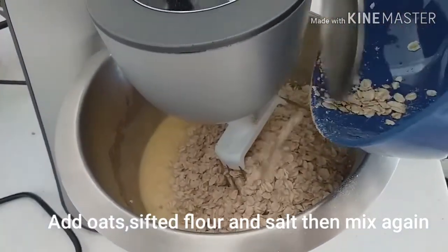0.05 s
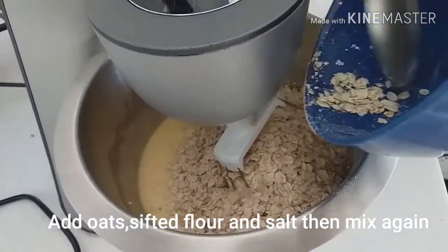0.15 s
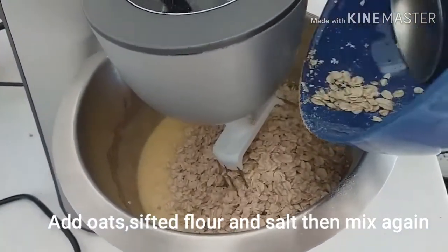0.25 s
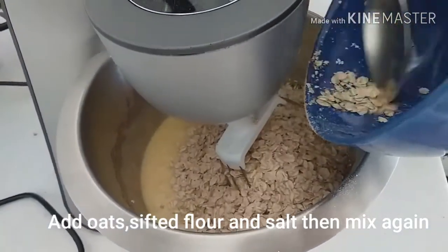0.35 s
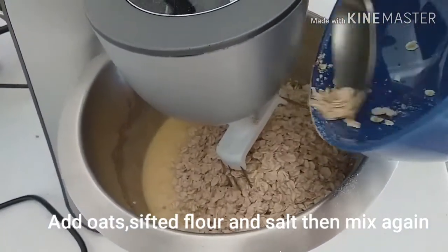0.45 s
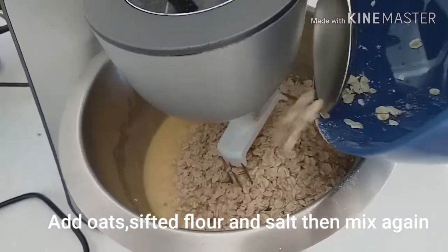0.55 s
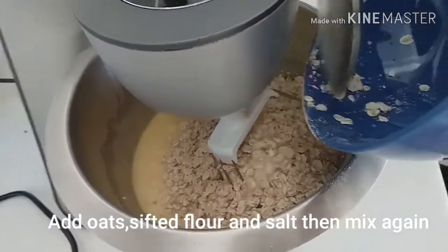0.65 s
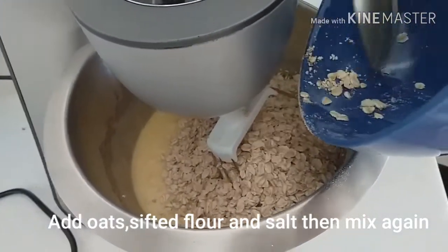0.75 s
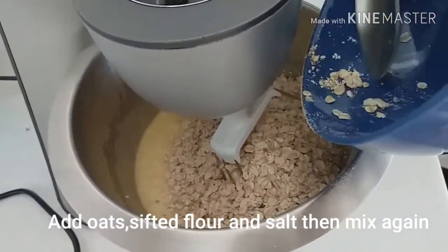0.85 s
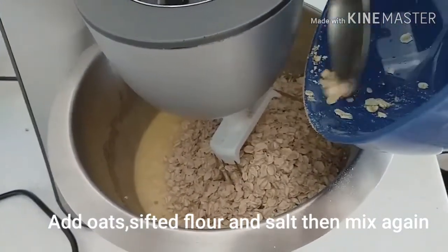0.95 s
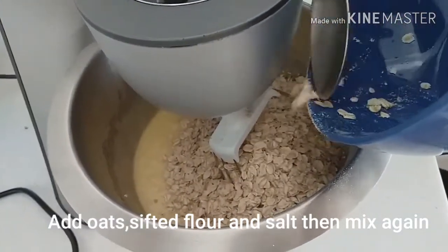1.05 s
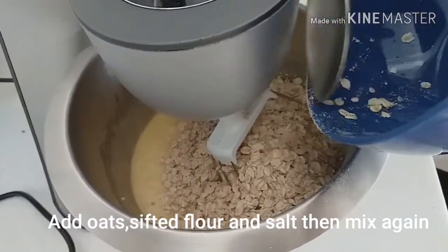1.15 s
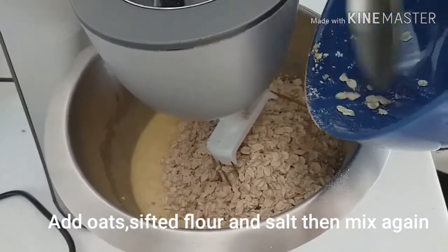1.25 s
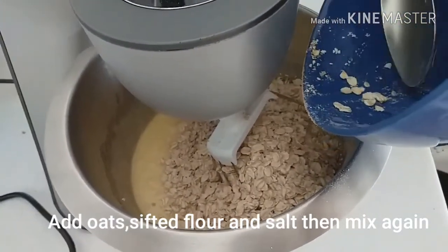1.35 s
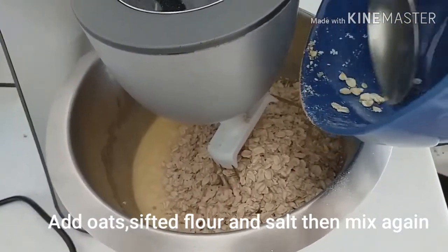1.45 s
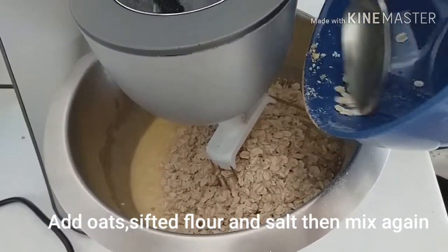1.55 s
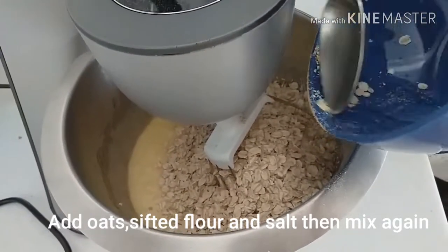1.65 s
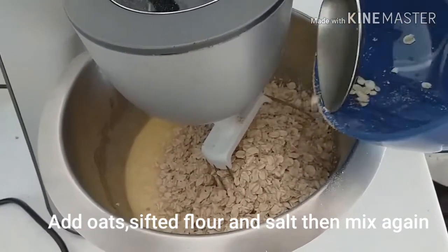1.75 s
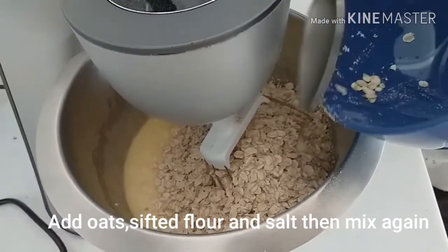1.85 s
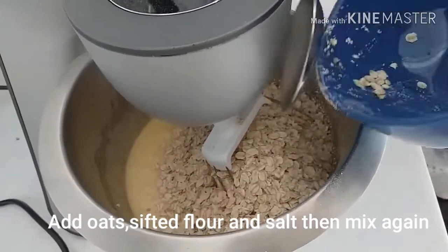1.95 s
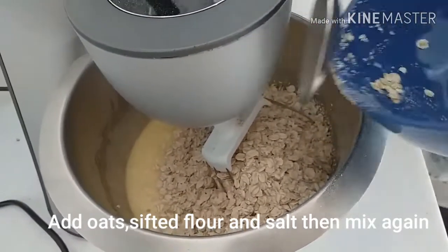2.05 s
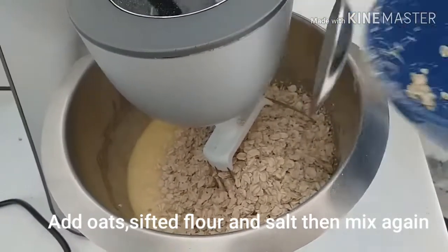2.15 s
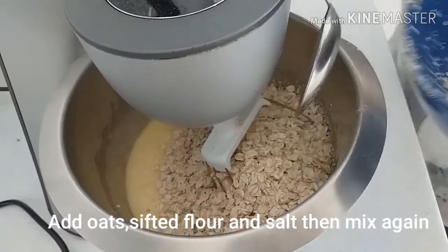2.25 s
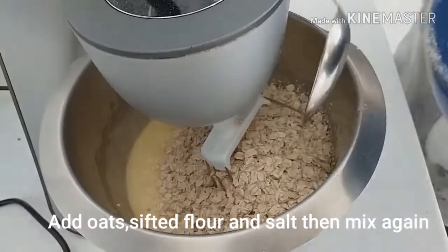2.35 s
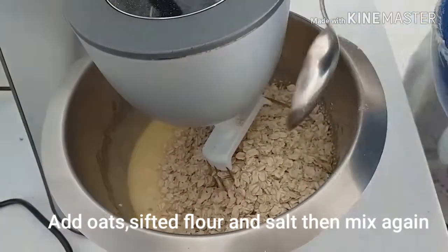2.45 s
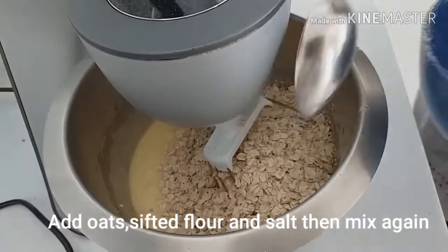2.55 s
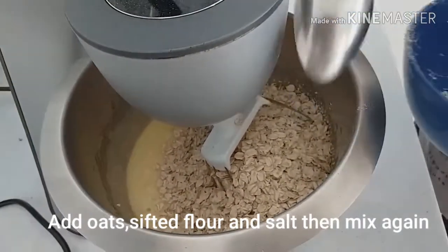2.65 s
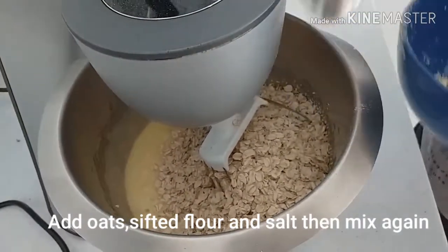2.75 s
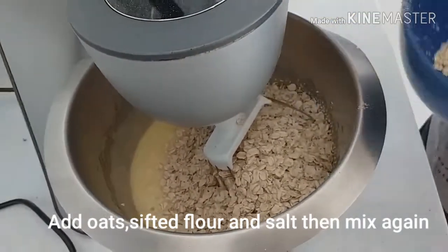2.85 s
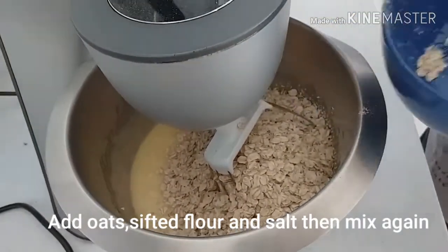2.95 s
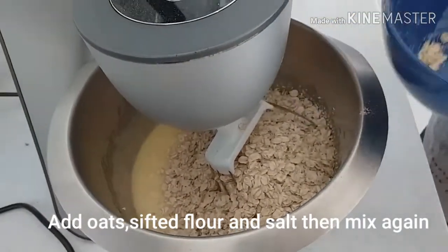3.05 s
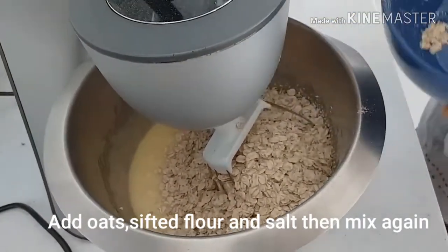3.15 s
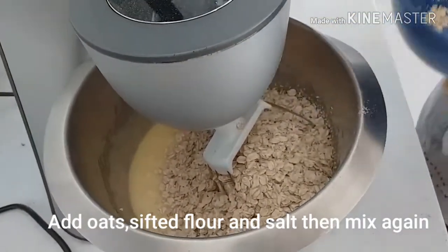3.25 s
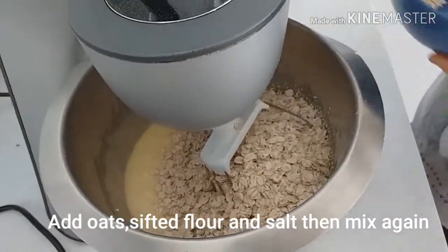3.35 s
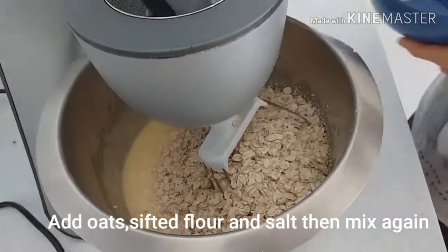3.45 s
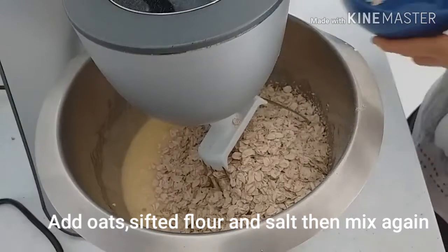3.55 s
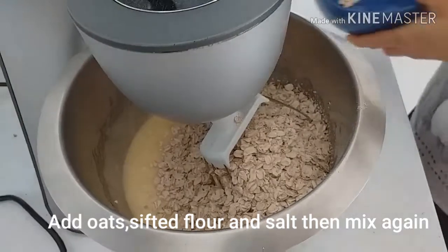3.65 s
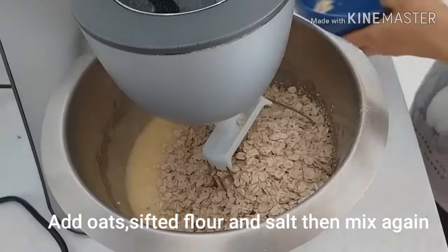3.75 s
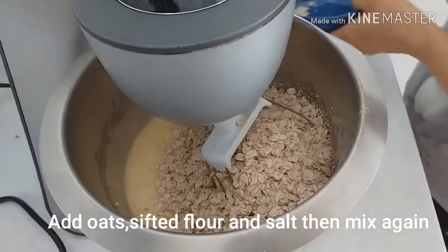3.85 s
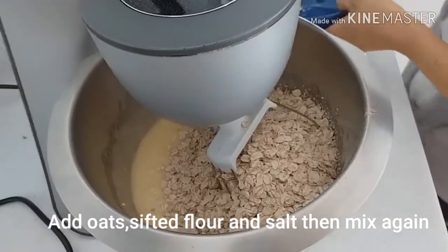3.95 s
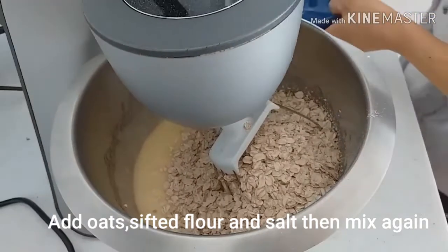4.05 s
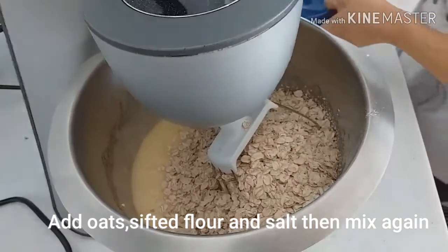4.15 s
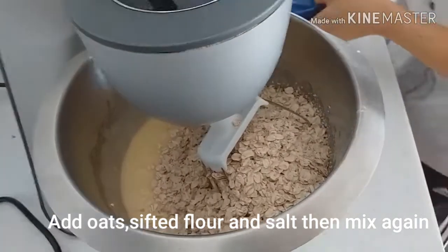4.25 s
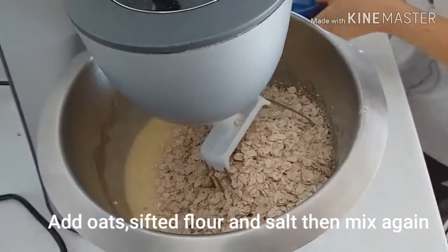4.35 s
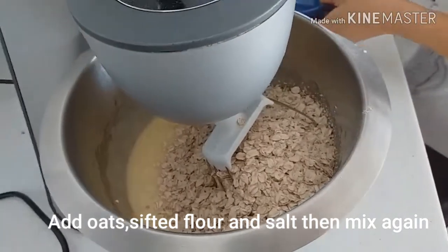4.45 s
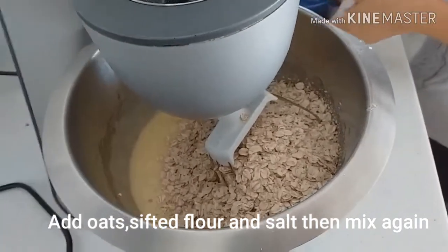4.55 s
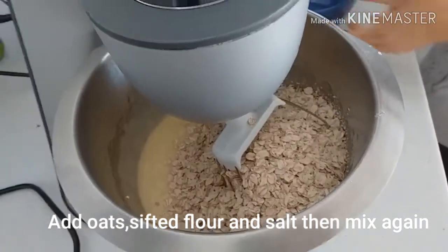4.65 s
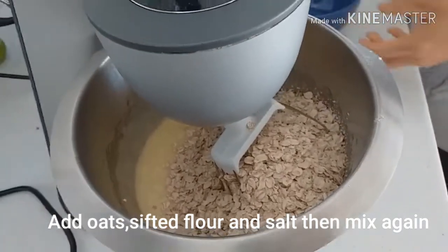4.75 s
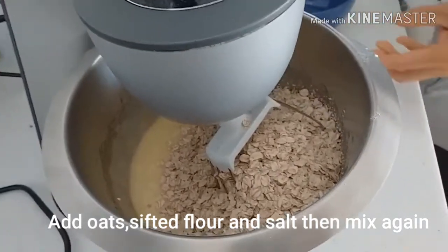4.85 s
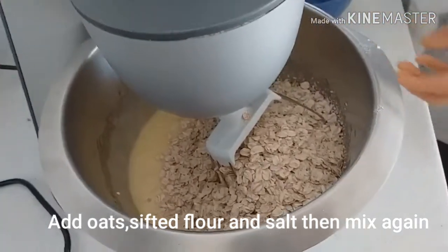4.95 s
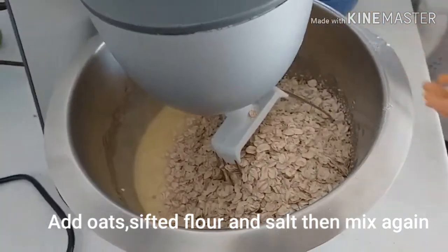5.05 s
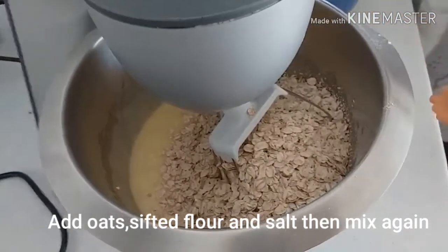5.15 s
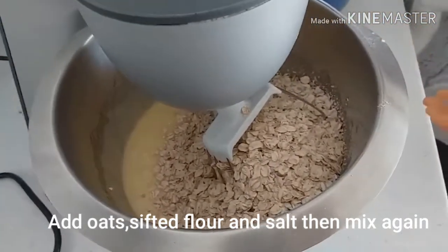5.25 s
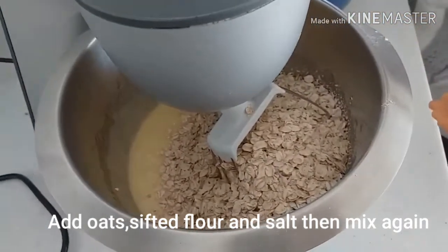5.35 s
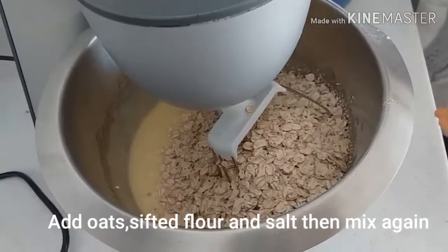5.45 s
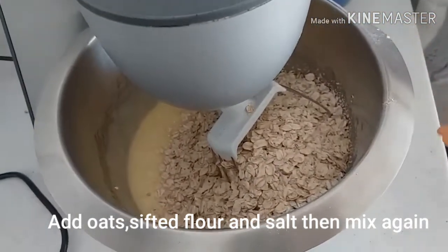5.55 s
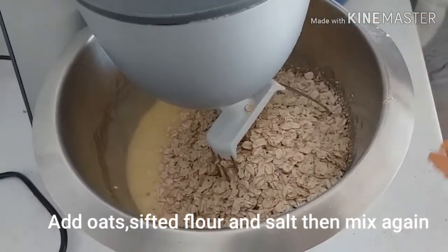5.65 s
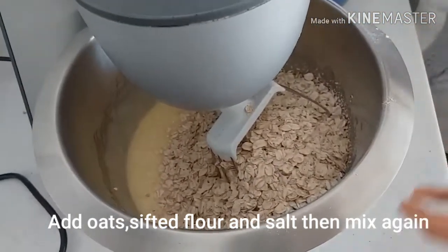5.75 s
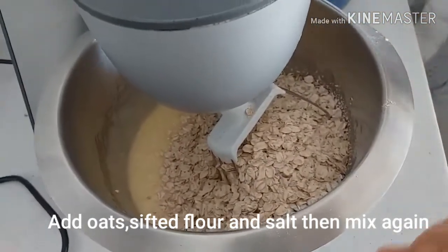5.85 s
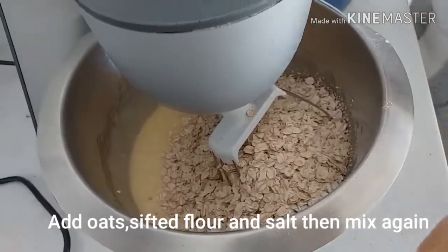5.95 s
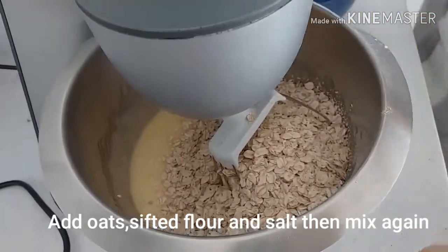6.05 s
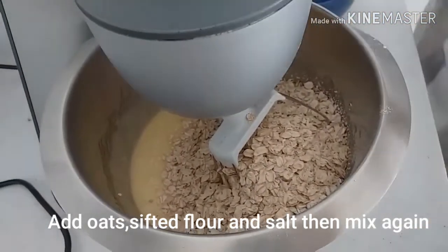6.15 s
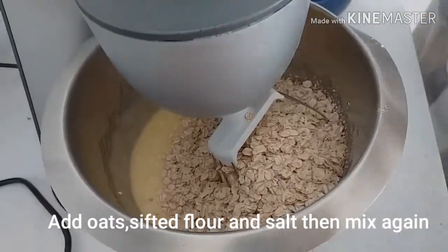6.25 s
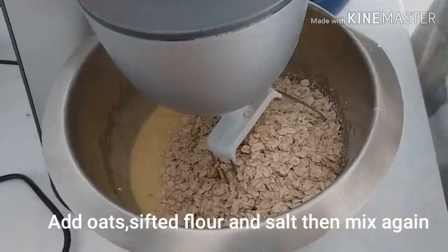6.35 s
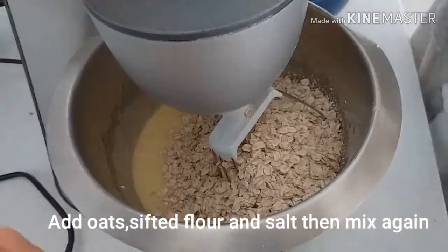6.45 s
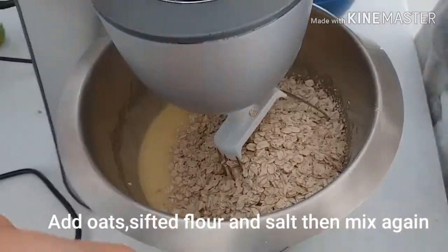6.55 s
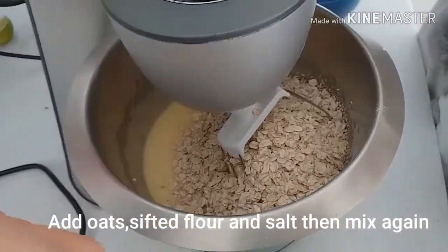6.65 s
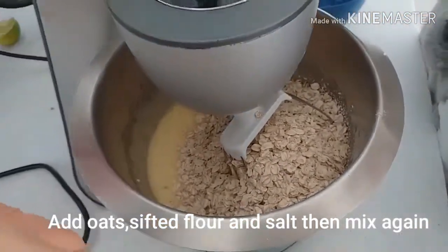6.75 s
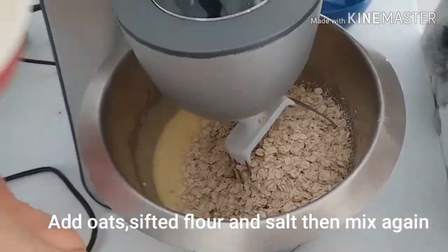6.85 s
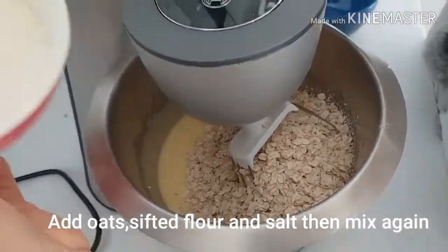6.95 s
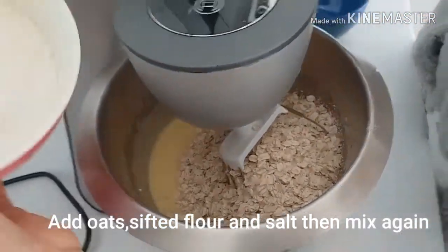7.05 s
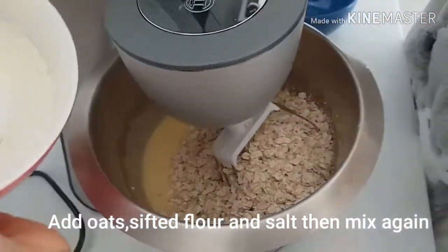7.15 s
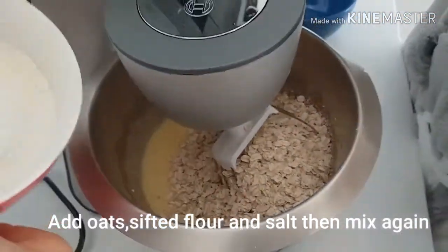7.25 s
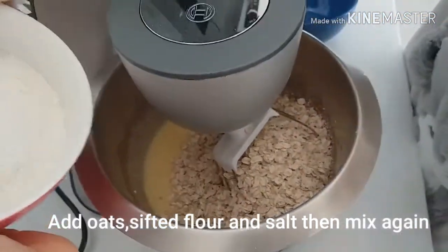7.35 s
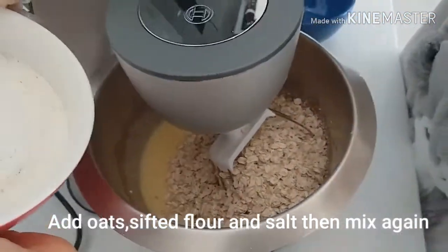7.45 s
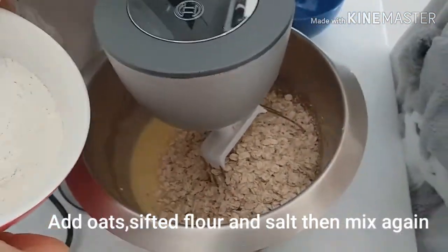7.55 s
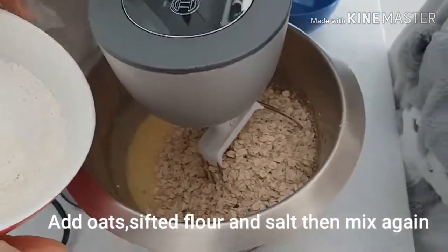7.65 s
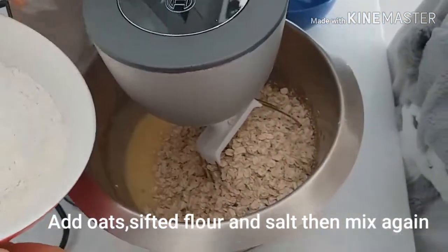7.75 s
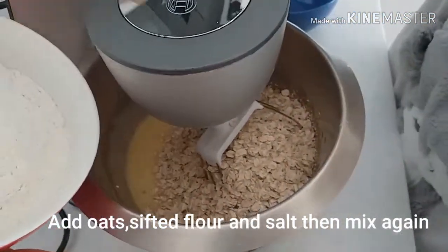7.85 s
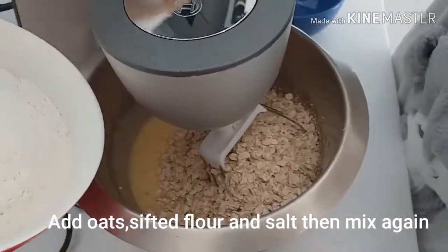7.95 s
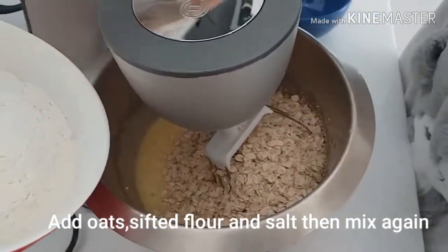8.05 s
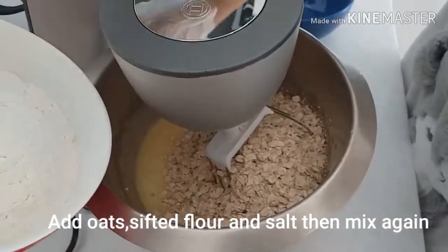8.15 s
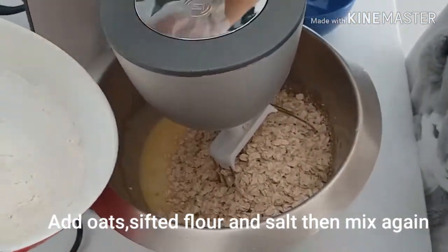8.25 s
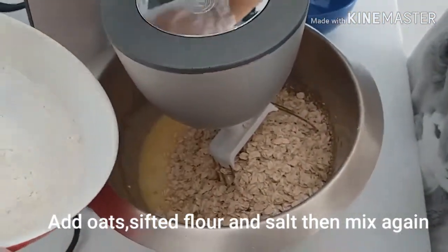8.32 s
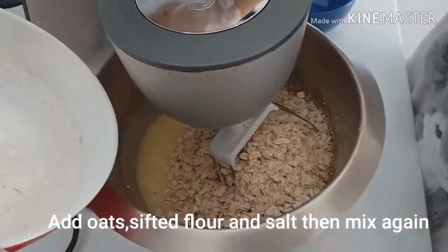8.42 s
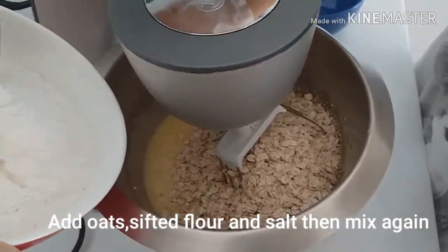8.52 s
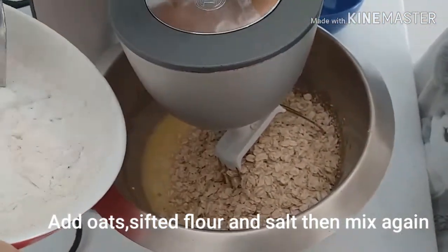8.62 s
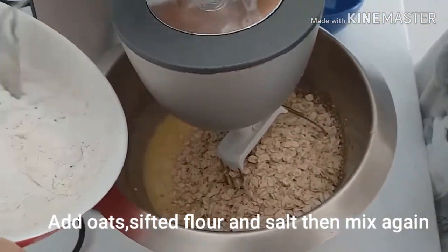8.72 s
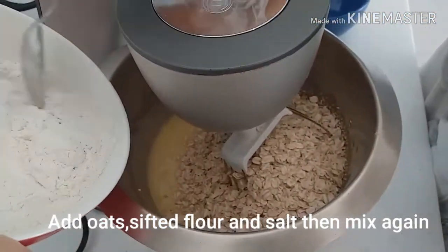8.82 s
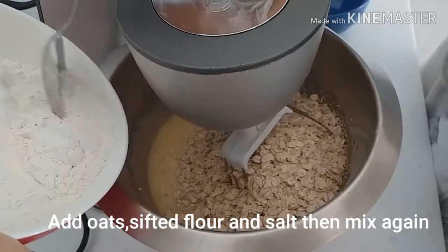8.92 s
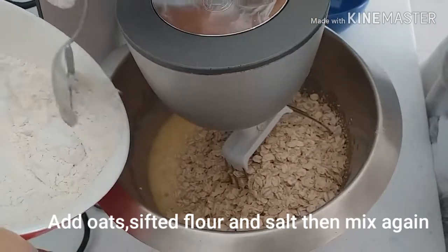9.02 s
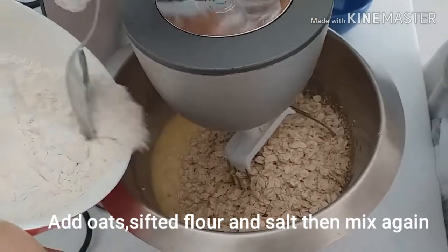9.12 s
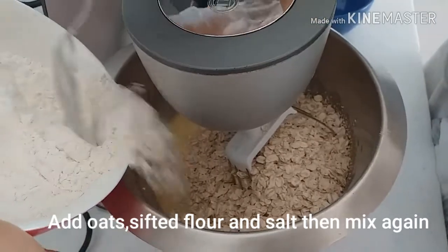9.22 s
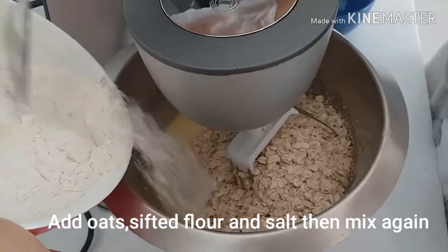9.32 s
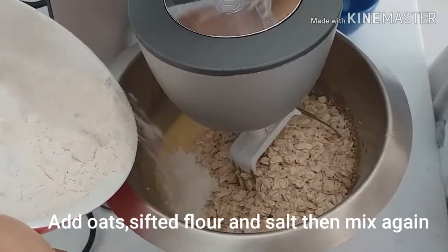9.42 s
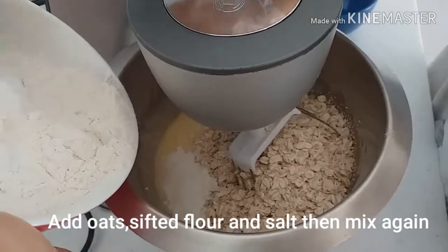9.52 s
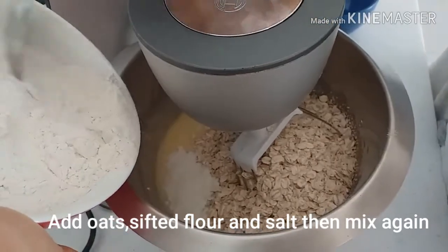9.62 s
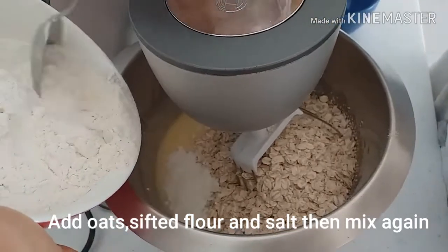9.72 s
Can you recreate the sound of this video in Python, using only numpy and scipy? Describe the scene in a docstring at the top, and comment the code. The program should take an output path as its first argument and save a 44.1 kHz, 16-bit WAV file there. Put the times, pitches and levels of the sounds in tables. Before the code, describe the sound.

A quiet small kitchen with hard walls, a faint low hum beneath, heard close up. From 0 to 2.1 s a steel spoon taps a plastic bowl irregularly, sharpest near 0.25 and 1.0 s, with short faint squeaky scrapes around 0.4, 1.0 and 1.5 s and soft patters of dry oats. Crisp ticks come at 2.2-2.45 s, then cloth rustles in swells until about 4.3 s, with a thin airy swish near 4 s. At 4.06 s the plastic bowl slaps down hard, the counter booms, and it rocks lightly at 4.25-4.3. Bright steel clinks with low bumps follow at 4.6 and 4.95 s. Rustling fades to near quiet around 5.5-6.8 s. A small clink at 7.6 and a dull bump at 7.77 s accompany stronger cloth rustle peaking at 8-8.2 s. Faint clink and bump at 8.9, a clearer, lower clink with bump at 9.5, then soft rustle.

```python
"""A low hum and soft rubbing, then a steel spoon taps and scrapes the last oats from a plastic bowl into a mixer.
The bowl lands on the counter, steel clinks, and an apron rustles as flour is fetched, bumped and spooned in.
Blows are decaying sine modes plus shaped noise bursts; drags are noise through resonances read at a varying speed;
rubbing is random slips under movement envelopes; a thin hiss is noise shifted to a moving pitch. The hum is a sine
over filtered noise. A small hard-walled kitchen answers the blows and the rustle."""
import sys
import numpy as np
from scipy import signal
from scipy.fft import rfft, irfft, next_fast_len
from scipy.io import wavfile
from scipy.ndimage import map_coordinates

SR = 44100
rng = np.random.default_rng(int(sys.argv[2]) if len(sys.argv) > 2 else 0)


def transcribe(signal):
    """Save signal, clipped to [-1, 1], as a 16-bit WAV file at the path in sys.argv[1]."""
    frames = np.atleast_2d(signal).T
    limited = np.clip(frames, -1, 1)
    pcm = np.round(limited * 32767).astype(np.int16)
    wavfile.write(sys.argv[1], SR, pcm)


N = 431298
CLOCK = np.arange(N) / SR  # whole scene, s
T = np.arange(SR // 2) / SR  # one blow, s


def amp(db):
    """Decibels to gain."""
    return 10 ** (np.asarray(db) / 20)


def unit(x):
    """Scale to rms 1."""
    return x / np.sqrt(np.mean(x ** 2) + 1e-20)


def along(points, hz):
    """Read (freq_hz, value) points on a log frequency axis."""
    point_hz, values = np.transpose(points)
    return np.interp(np.log(hz + 1), np.log(point_hz), values)


def filtered(x, response):
    """Multiply the spectrum of x by a response of frequency in Hz."""
    size = next_fast_len(len(x) + SR // 4)
    spectrum = rfft(x, size) * response(np.fft.rfftfreq(size, 1 / SR))
    return irfft(spectrum, size)[:len(x)]


def coloured(x, spectrum):
    """Filter x by (freq_hz, level_db) points, then scale to rms 1."""
    return unit(filtered(x, lambda hz: amp(along(spectrum, hz))))


def wobble(rate):
    """Smooth random curve over the scene, rate knots per second."""
    knots = rng.standard_normal(int(N * rate / SR) + 4)
    return map_coordinates(knots, [CLOCK * rate])


def fade(t60, t=T):
    """Exponential decay: -60 dB after t60 seconds."""
    return 1000 ** (-t / t60)


def burst(spectrum, t60):
    """Many crowded modes dying together, as decaying noise whose energy grows with t60."""
    decay = fade(t60)
    noise = coloured(rng.standard_normal(len(T)), spectrum)
    return unit(noise * decay) * np.sqrt(np.mean(decay ** 2))


def ring(modes, scatter_db):
    """Sum separate (freq_hz, level_db, t60_s) modes, with random sign and strength for each blow."""
    total = 0
    for hz, db, t60 in modes:
        strength = amp(db + scatter_db * rng.normal()) * rng.choice([-1, 1])
        total = total + strength * np.sin(2 * np.pi * hz * T) * fade(t60)
    return total


def add(track, s, sound):
    """Mix a sound into a track at time s."""
    part = track[round(s * SR):][:len(sound)]
    part += sound[:len(part)]


def in_kitchen(x, wet_db, near_db=-8, near_t60=0.038):
    """Direct sound, quick echoes off mixer and counter, and a room tail that decays by frequency."""
    # Room decay: freq_hz, t60_s
    kitchen_t60 = [(100, 0.41), (400, 0.84), (1500, 0.67), (4000, 0.54), (8000, .42), (15000, 0.15)]
    hz, t, z = signal.stft(rng.standard_normal(SR), SR, nperseg=256)
    decay = fade(along(kitchen_t60, hz)[:, None], t)
    tail = signal.istft(z * decay, SR, nperseg=256)[1]
    near = rng.standard_normal(len(T)) * fade(near_t60) * (T > .002)
    echo = amp(wet_db) * tail / np.linalg.norm(tail)
    add(echo, 0, amp(near_db) * near / np.linalg.norm(near))
    echo[0] = 1  # direct sound
    return signal.fftconvolve(x, echo)


def gesture(s, attack, hold, release):
    """Movement speed, 0 to 1: tenfold growth per attack time, hold from s, tenfold fall per release time."""
    before = np.maximum(s - CLOCK, 0) / attack
    after = np.maximum(CLOCK - s - hold, 0) / release
    return 10 ** -np.minimum(before + after, 10)


def background(air_db=-64, hum_db=-71, hum_hz=100):
    """Low room noise and an appliance's mains hum, both drifting in level."""
    # Quiet kitchen spectrum: freq_hz, level_db
    air_spectrum = [(15, -59), (25, -29.5), (102, -1), (124, -9.5), (146, -4.5), (240, -3.5), (277, -3),
                    (421, -14), (681, -18.5), (832, -27), (1100, -17.5), (1350, -31), (3000, -42),
                    (3900, -69.5), (6600, -120)]
    air = coloured(rng.standard_normal(N), air_spectrum)
    hum = np.sin(2 * np.pi * hum_hz * CLOCK)
    air_gain = amp(air_db + 2.4 * wobble(rate=5.2))
    hum_gain = amp(hum_db + 1.3 * wobble(rate=6.7))
    return air_gain * air + hum_gain * hum


def swish(width_hz=1200):
    """Thin sliding hiss: low-passed noise multiplied by a sine of moving pitch."""
    # Hiss path: time_s, level_db, centre_hz
    swish_path = [(3.66, -61, 12100), (3.7, -49, 12400), (3.94, -43.5, 13900), (4.1, -48.5, 14200),
                  (4.26, -49, 12190), (4.4, -59, 11220)]
    path_s, path_db, path_hz = np.transpose(swish_path)
    db = np.interp(CLOCK, path_s, path_db)
    hz = np.interp(CLOCK, path_s, path_hz)
    hiss = unit(filtered(rng.standard_normal(N), lambda f: np.exp(-(f / width_hz) ** 2)))
    moving = (CLOCK > path_s[0]) & (CLOCK < path_s[-1])
    return moving * amp(db) * hiss * np.sin(2 * np.pi * np.cumsum(hz) / SR)


def friction_levels():
    """Gains of rubbing, fizz and sliding: each arm movement or landing spoonful of oats drives all three."""
    # Arm movements: full_speed_s, attack_s, hold_s, release_s, level_db, fizz_relative_db, slide_relative_db
    arm_moves = [(.005, .05, 0.018, 0.18, -72, -6, 15.5), (2.19, 0.15, 0.07, 0.31, -64.5, -3, -4),
                 (2.52, .25, 0.17, 0.27, -45.5, 1.5, -13), (2.82, .08, 0.033, 0.18, -52.5, 5, -14),
                 (2.97, 0.17, 0.081, 0.12, -49, 3.5, -21.5), (3.17, 0.15, 0.37, .3, -52, 1, -21),
                 (3.71, .1, 0.077, .3, -46, -2, -22), (3.91, 0.21, 0.25, .28, -45, 0.5, -24.5),
                 (4.56, 0.56, 0.18, 0.65, -53, -0.5, -9.5), (5.75, 0.32, 1.02, 0.65, -70.5, -1.5, -9),
                 (6.33, .3, 0.13, 0.3, -62, -4, -14), (7.08, 0.15, 0.2, 0.46, -55.5, -0.5, -14),
                 (7.64, 0.27, 0.12, 0.27, -48, -1, -12), (7.96, 0.16, 0.042, 0.34, -42.5, 0, -12),
                 (8.22, 0.14, 0.048, 0.23, -42.5, -1.5, -14), (8.48, .3, 0.21, 0.63, -55.5, 0.5, -22),
                 (9.38, .6, .06, .4, -64.5, 0.5, -17), (9.72, 0.28, .06, .3, -54, 0.5, -13)]
    # Oats landing on the heap: full_speed_s, level_db, thud_relative_db
    oat_falls = [(.06, -63, 2.5), (.625, -61.5, -5), (1.16, -68, -10), (1.26, -73.5, -24)]
    attack_s, hold_s, release_s, fall_fizz_db = 0.094, 0.015, 0.11, 2
    falls = [(s, attack_s, hold_s, release_s, db, fall_fizz_db, thud_db) for s, db, thud_db in oat_falls]
    # rub, fizz, slide at rest: the cook is never quite still
    rest_db = [[-74.5], [-73.5], [-83]]
    power = amp(rest_db) ** 2 * np.ones(N)
    for s, attack, hold, release, db, fizz_db, slide_db in list(arm_moves) + falls:
        speed = gesture(s, attack, hold, release)
        power += (amp([[db], [db + fizz_db], [db + slide_db]]) * speed) ** 2
    uneven_db, uneven_per_s = 1.2, 14  # pressure varies
    return np.sqrt(power) * amp(uneven_db * wobble(rate=uneven_per_s))


def grains(spectrum, clumps, rate, spread_db, clump_db):
    """Tiny slips of random size, rate per second, their level following the clumps curve."""
    hits = rng.random(N) < rate / SR
    slips = hits * rng.standard_normal(N) * amp(spread_db * rng.standard_normal(N))
    return coloured(slips * amp(clump_db * clumps), spectrum)


def patchy(x, depth_db, rate=9, band_hz=900):
    """The colour drifts as the rubbing spot changes: a smooth random gain over time and frequency."""
    hz, t, z = signal.stft(x, SR, nperseg=256)
    knots = rng.standard_normal((64, 256))
    places = np.meshgrid(hz / band_hz, t * rate, indexing="ij")
    field = map_coordinates(knots, places, mode="mirror")
    return signal.istft(z * amp(depth_db * field), SR, nperseg=256)[1][:N]


def rustle(rub_db=0, fizz_db=-1, slide_db=0, crackle_db=-9, tick_db=-8):
    """Cloth, dry flakes and bowls rub in countless small slips, with crisp ticks on top."""
    # Spectra: freq_hz, level_db
    fabric_spectrum = [(350, -35.5), (900, -21), (1400, -9.5), (2100, -5.5), (3300, -1), (4300, 3.5),
                       (5700, 0), (8100, 1), (9100, -7), (11000, -21), (14000, -45.5)]
    fizz_spectrum = [(7000, -39.5), (9300, -12), (10500, -5.5), (14500, -2.5), (16000, -6)]
    slide_spectrum = [(200, 3), (550, 1), (1200, 1), (1700, -3), (2500, -8.5), (4000, -17.5), (8000, -38.5)]
    tick_spectrum = [(500, -28), (2000, -10), (4500, -7), (8000, -1), (9500, -7.5), (15000, -5.5)]
    # Crispest ticks of flakes and folds: start_s, level_db (before tick_db)
    tick_rows = [(.534, -39), (2.187, -30.5), (2.199, -30), (2.269, -25), (2.358, -21), (2.397, -23),
                 (2.408, -25.5), (2.441, -25), (3.138, -26), (3.606, -29.5), (6.878, -36.5), (7.056, -29),
                 (7.075, -31), (8.918, -27)]
    rubbing, fizzing, sliding = friction_levels()
    # shared, so rubbing and fizz catch and slip together
    clumps = wobble(rate=50) + wobble(rate=280)
    rub = grains(fabric_spectrum, clumps, rate=5000, spread_db=0.5, clump_db=1.12)
    fizz = grains(fizz_spectrum, clumps, rate=7200, spread_db=4.0, clump_db=1.5)
    slide = grains(slide_spectrum, clumps, rate=3000, spread_db=2.5, clump_db=-1.5)
    crackle = grains(tick_spectrum, clumps, rate=37, spread_db=2, clump_db=-0.5)  # folds snap over
    out = rubbing * amp(rub_db) * rub
    out += fizzing * amp(fizz_db) * fizz
    out += sliding * amp(slide_db) * slide
    out += fizzing * amp(crackle_db) * crackle
    for s, db in tick_rows:
        hz = 4700 * np.exp(0.095 * rng.normal())
        flake = ring([(hz, -9, .011), (hz * 1.55, -8, .009)], scatter_db=2)
        tick = (burst(tick_spectrum, t60=0.012) + flake) * (1 - fade(0.0018))
        add(out, s, amp(db + tick_db) * tick)
    return in_kitchen(patchy(out, depth_db=2.5), wet_db=-13.5, near_db=-10)[:N]


def bumps():
    """Soft contacts shake the heavy mixer: four low modes with a slow onset."""
    # Bumps through the mixer's body: start_s, level_db, pitch_hz
    bump_rows = [(4.599, -42.5, 129), (4.946, -44, 152), (7.767, -34, 116), (7.8, -47, 66),
                 (8.89, -42.5, 117.6), (9.12, -52, 201), (9.525, -38, 123.5)]
    out = np.zeros(N)
    for s, db, hz in bump_rows:
        modes = [(hz * .66, -7, .25), (hz, 0, .2), (hz * 1.55, -7, .14), (hz * 2.45, -9, .12)]
        body = ring(modes, scatter_db=1) * (1 - fade(0.033))
        add(out, s, in_kitchen(amp(db) * body, wet_db=-5.5))
    return out


def bowl_landing():
    """The plastic bowl slaps down and rocks in quick contacts; the counter booms under it."""
    # Contacts: start_s, slap_db, counter_thud_db, room_db
    landing_rows = [(4.062, -12.5, -26.5, -3.5), (4.0642, -11.5, -28, -8.5), (4.068, -13.5, -37.5, -11.5),
                    (4.252, -25.5, -39, -4.5), (4.286, -30, -34, -7), (4.297, -25, -37.5, -8)]
    # Spectra: freq_hz, level_db
    plastic_spectrum = [(150, -25.5), (500, -6.5), (800, -7.5), (1030, 11.5), (1200, 2), (1320, -1.5),
                        (1530, 7.5), (2150, -7.5), (2500, -14), (3200, -11), (5000, -23), (9000, -45)]
    counter_spectrum = [(30, -48), (75, -14), (115, 4), (170, -3.5), (240, -1.5), (310, -6), (385, 4.5),
                        (470, -1), (900, -6.5), (2000, -31.5)]
    out = np.zeros(N)
    for s, db, thud_db, room_db in landing_rows:
        slap = amp(db) * burst(plastic_spectrum, t60=0.018)
        thud = amp(thud_db) * burst(counter_spectrum, t60=0.21)
        add(out, s, in_kitchen(slap + thud, wet_db=room_db, near_db=-18))
    return out


def clinks(crowd_db=-5, crowd_width=.03):
    """Steel rings in clear modes, each amid short-lived neighbours, with a clack and one rebound."""
    # Clinks: start_s, ring_db, clack_db, clack_brightness_hz, rebound_delay_s, rebound_relative_db,
    # ring_time_share_left_by_grip, room_db
    clink_rows = [(4.6003, -14, -21, 16600, 0.0074, -6.5, 0.52, -4.5),
                  (4.9449, -19.5, -32.5, 1180, .004, 4, 0.74, -4.5),
                  (7.5994, -25.5, -32, 8950, 0.012, -3, 0.35, -7.5),
                  (8.8865, -30.5, -34, 10900, .003, -7, 0.35, -9.5),
                  (9.5227, -20.5, -26.5, 4460, 0.013, -6, 0.54, -7.5)]
    # Modes, excited by place of contact: freq_hz, free_t60_s, then level_db for each of the five clinks
    steel_modes = [(1106, 0.11, -19, -43, -31, -47, -5), (1214, 0.046, -13, -34, -7.5, -36, -8),
                   (1404, 0.076, -15.5, -36.5, -13, -35, -16), (1630, 0.024, -47, -9, 3.5, -36, -19),
                   (2297, 0.018, -21, -17, -21, -22, -5.5), (2580, 0.14, -22, -38, -20, -17, -11.5),
                   (3360, 0.065, -26.5, -16, -4, -21, -15), (3544, 0.084, -27.5, -1.5, -20, -7, -27),
                   (3700, 0.096, -16.5, -27, -7, -3.5, -21), (4614, 0.018, 3, -33, -12, 0, -7),
                   (4708, 0.14, -6.5, -26.5, -17, -6, -11.5), (5200, 0.059, -10, -32, 0, -2, -19),
                   (5590, 0.11, -21.5, -29, -12, -7, -26), (6036, 0.077, -11.5, -20, -27, -3, -9.5),
                   (7690, 0.022, -17.5, -47, -1, 6, -25), (9560, 0.075, -12, -72, -6.5, -25, -47),
                   (10406, 0.083, -8.5, -53.5, -24, -28, -40), (13460, 0.064, -14, -44, -13, -22, -24)]
    out = np.zeros(N)
    hz, t60, *places = np.transpose(steel_modes)
    for row, strengths in zip(clink_rows, places):
        s, ring_db, clack_db, bright_hz, delay, rebound_db, free, room_db = row
        colour = [(200, -8), (bright_hz / 2, 0), (bright_hz, -4), (bright_hz * 3, -22)]

        def clusters(f):
            """Narrow noise band around each mode."""
            bands = [amp(db) ** 2 / c / (1 + ((f / c - 1) / crowd_width) ** 4) for c, db in zip(hz, strengths)]
            return np.sqrt(sum(bands))

        crowd = unit(filtered(rng.standard_normal(len(T)), clusters)) * fade(0.043 * free)
        clear = ring(zip(hz, strengths, t60 * free), scatter_db=0)
        blow = amp(ring_db) * (clear + amp(crowd_db) * crowd)
        blow += amp(clack_db) * burst(colour, t60=0.017)
        add(blow, delay, amp(clack_db + rebound_db) * burst(colour, t60=0.019))
        blow *= 1 - fade(.003)  # soft onset
        add(out, s, in_kitchen(blow, wet_db=room_db, near_db=-12))
    return out


def spoon_drags(waver_hz=14):
    """Friction keeps the spoon's modes sounding; a faster stroke is louder and slightly higher."""
    # Strokes over the plastic: full_speed_s, attack_s, hold_s, release_s, level_db
    stroke_rows = [(0.403, .05, 0.022, 0.09, -55), (0.961, 0.15, 0.036, 0.044, -50.5),
                   (1.514, 0.039, 0.15, 0.052, -55.5)]
    # Dragged spoon, before the pitch shift: freq_hz, width_hz, level_db
    squeal_modes = [(846, 140, 0.5), (1890, 28, 12.5), (3180, 200, -6), (4780, 260, -12), (6600, 400, -17)]
    rest_hz, bend_hz = 1857, 69.7  # second mode at rest, and its rise at full speed

    def resonances(f):
        """Complex sum of band-pass modes."""
        return sum(amp(db) * 1j * f * w / (c * c - f * f + 1j * f * w) for c, w, db in squeal_modes)

    out = np.zeros(N)
    for s, attack, hold, release, db in stroke_rows:
        speed = gesture(s, attack, hold, release)
        hz = rest_hz + bend_hz * speed + waver_hz * wobble(rate=45)
        sound = unit(filtered(rng.standard_normal(N), resonances))
        # reading faster raises every mode together
        position = np.cumsum(hz / squeal_modes[1][0])
        out += speed * amp(db) * np.interp(position, np.arange(N), sound)
    return out


def spoon_taps():
    """Each tap rings the spoon and knocks the plastic wall; oats under the spoon soften the contact."""
    # Taps: start_s, spoon_ring_db, bowl_knock_db, bowl_pitch_hz, crack_db, contact_brightness_hz, room_db
    tap_rows = [(.251, -21.5, -37.5, 618, -26.5, 11500, -8.5), (.552, -48, -38, 542, -53, 2500, -10),
                (0.807, -39.5, -48, 483, -52, 5000, -10), (1.007, -50, -41.5, 326, -43, 4000, 0),
                (1.03, -21, -33, 498, -29, 2900, -19), (1.438, -38, -40.5, 437, -46.5, 10200, -14),
                (1.671, -37, -30.5, 360, -48, 2690, -3), (1.794, -39.5, -45.5, 1203, -40.5, 14000, -18),
                (1.945, -50, -45.5, 426, -45, 12740, -5), (2.087, -49, -43, 620, -38.5, 7400, -19),
                (2.715, -48, -44, 696, -44, 3000, -15), (7.759, -45, -43, 302, -40, 5000, 2)]
    # Hand-held spoon: freq_hz, level_db, t60_s
    spoon_modes = [(829, -15, .1), (1900, -4, .07), (2185, -16, .025), (2936, -20, .05), (3300, -15, .05),
                   (5470, -19, .14), (6998, -14, .04), (7870, -18, .06), (10020, -26, .12),
                   (11765, -20, .05), (15100, -26, .1)]
    crack_spectrum = [(200, -7.5), (900, 0), (3500, -4.5), (7500, -2.5), (9000, -8.5), (15000, -8)]  # Hz, dB
    out = np.zeros(N)
    for s, ring_db, knock_db, hz, crack_db, bright_hz, room_db in tap_rows:
        wall_modes = [(hz * .64, -10, .06), (hz, -1, .05), (hz * 1.17, -7, .04),
                      (hz * 1.7, -11, .02), (hz * 2.6, -11, .02)]
        wall = ring(wall_modes, scatter_db=1) * (1 - fade(0.0016))
        crack = burst(crack_spectrum, t60=0.052)
        contact = signal.butter(2, min(bright_hz, SR * .45), fs=SR)  # low-pass
        strike = amp(ring_db) * ring(spoon_modes, scatter_db=2.5) + amp(crack_db) * crack
        metal = signal.lfilter(*contact, strike) * (1 - fade(0.003))
        add(out, s, in_kitchen(metal, wet_db=room_db, near_db=-13.5))
        add(out, s, in_kitchen(amp(knock_db) * wall, wet_db=-8.5, near_db=0.0))
    return out


def scene():
    """Sum of all the layers, one channel."""
    surroundings = background() + swish() + rustle()
    contacts = bumps() + bowl_landing() + clinks()
    spoon = spoon_drags() + spoon_taps()
    return (surroundings + contacts + spoon)[None]


def record(dry):
    """The microphone loses the deepest bass; the recorder keeps nothing above its band limit."""
    top_hz, slope_hz = 15750, 400
    thinned = signal.lfilter(*signal.butter(2, 45, "high", fs=SR), dry)

    def band_limit(hz):
        """Straight slope from 1 to 0, centred on top_hz."""
        return np.clip((top_hz - hz) / slope_hz + .5, 0, 1)

    return np.array([filtered(channel, band_limit) for channel in thinned])


dry = scene()
out = record(dry)
transcribe(out)
```